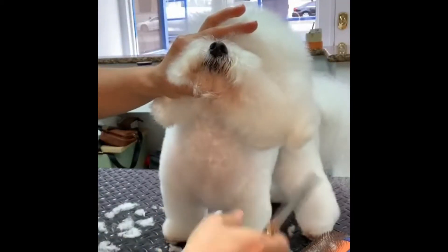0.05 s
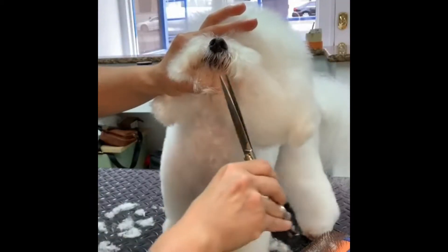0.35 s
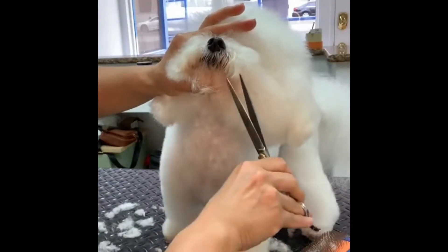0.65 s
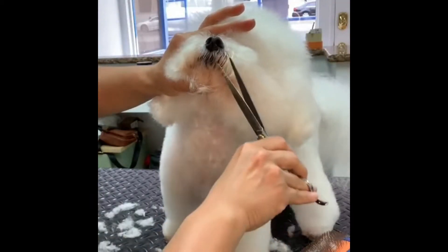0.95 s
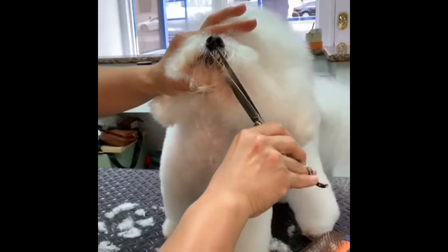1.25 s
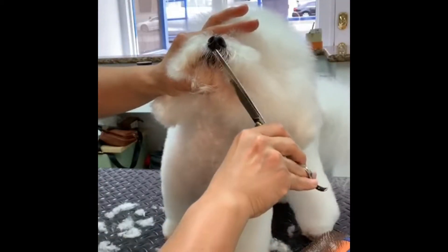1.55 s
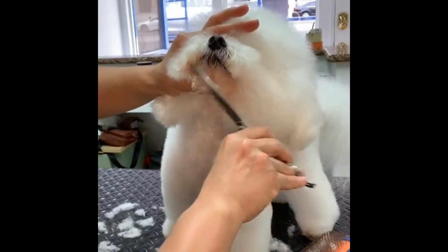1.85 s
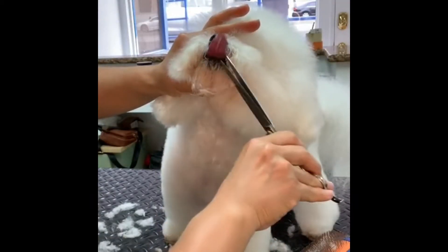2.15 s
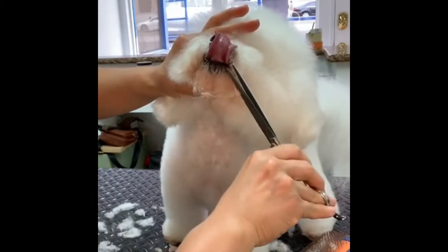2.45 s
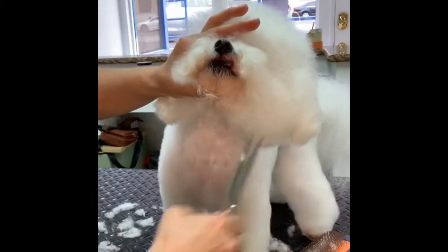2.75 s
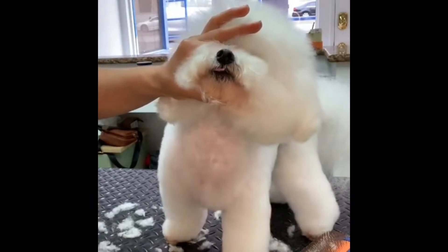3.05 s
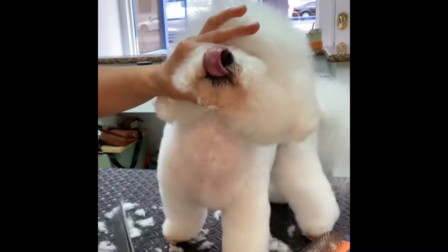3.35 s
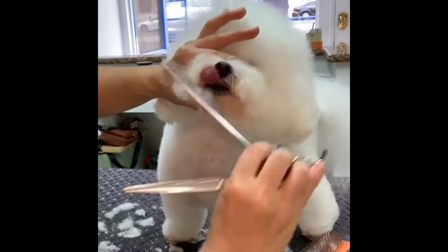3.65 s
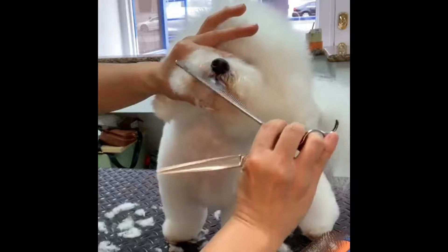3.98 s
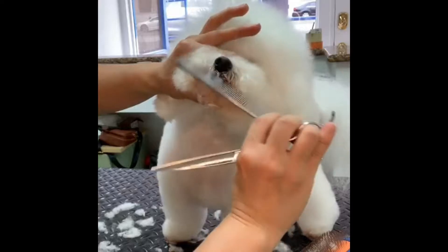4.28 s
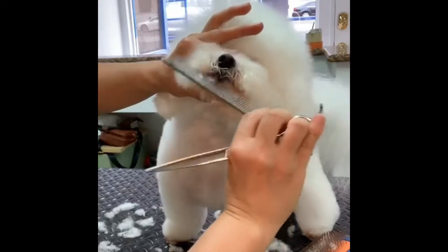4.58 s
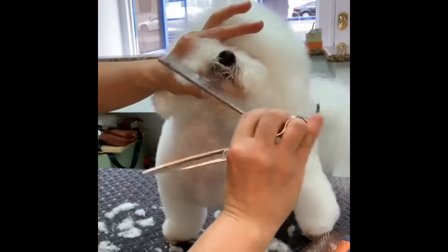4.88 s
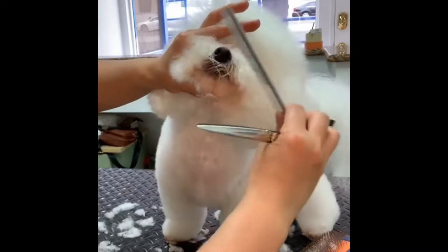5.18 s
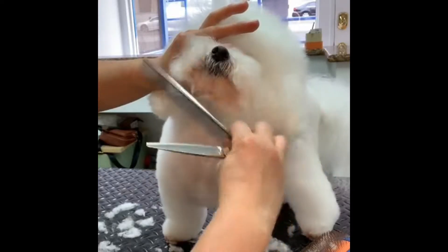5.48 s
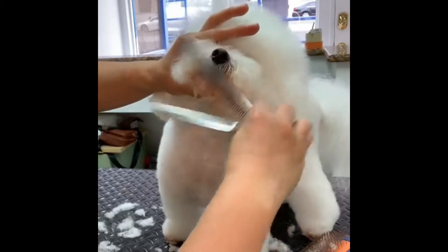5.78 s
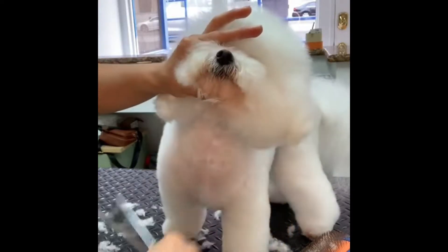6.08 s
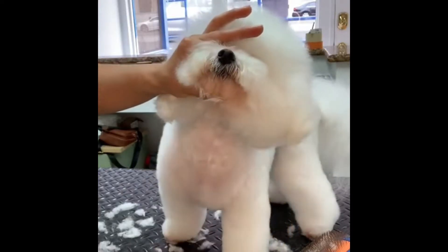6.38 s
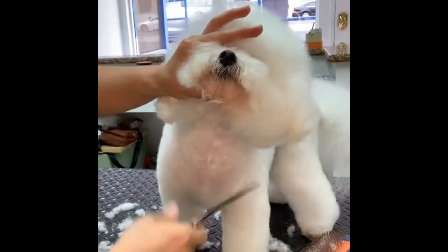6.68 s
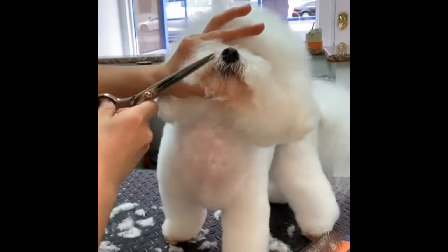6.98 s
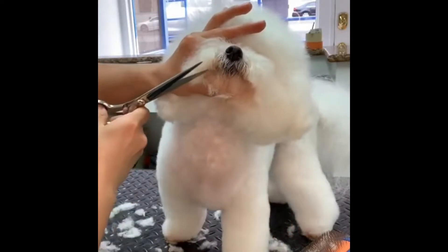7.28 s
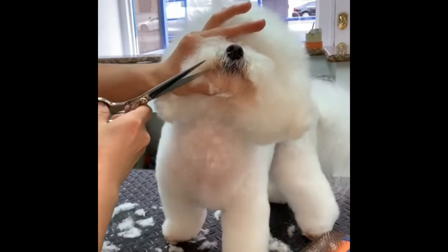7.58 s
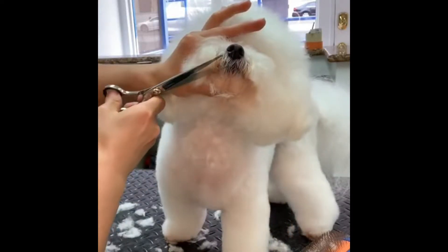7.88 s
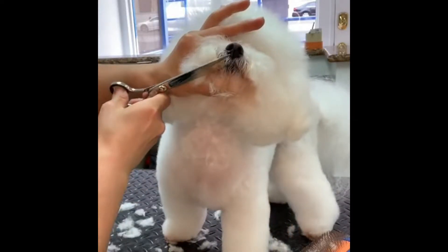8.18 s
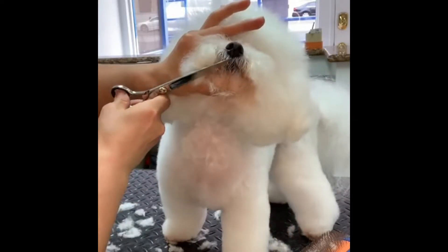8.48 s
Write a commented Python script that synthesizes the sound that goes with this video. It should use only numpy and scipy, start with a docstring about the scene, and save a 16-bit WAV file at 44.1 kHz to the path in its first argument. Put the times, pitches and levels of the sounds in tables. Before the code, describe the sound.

Grooming scissors snip and click up close while a metal comb clatters onto a counter twice, over low ventilation rumble.

```python
"""A metal comb clatters onto a counter over low ventilation rumble, in a bare, echoing grooming room.
Close to the microphone a dog is being trimmed: steel scissors slide, snip and click against the comb,
held in the same hand, and the steel rings on. A little further off, with more room in the sound,
the counter takes dull bumps, and the comb is picked up with a clink and dropped back, rocking to rest."""
import sys
import numpy as np
from scipy import signal
from scipy.fft import rfft, irfft
from scipy.io import wavfile

SR = 44100
rng = np.random.default_rng(int(sys.argv[2]) if len(sys.argv) > 2 else 0)


def log_audio(samples):
    """Write samples as a 16-bit WAV file to the path given in sys.argv[1]."""
    # one column per channel
    frames = np.atleast_2d(samples).T
    # limit to full scale, then quantise
    limited = np.clip(frames, -1, 1)
    pcm = np.round(limited * 32767).astype(np.int16)
    wavfile.write(sys.argv[1], SR, pcm)


N = 376173
RING_TIME = np.arange(int(1.3 * SR)) / SR  # time axis of one decay, t/s

# the counter's resonances: f/Hz, width/Hz, gain/dB
COUNTER_RESONANCES = [(100, 15, 3.5), (337, 53, 1.5), (670, 60, 0), (890, 28, -3), (1145, 41, -2),
                      (1434, 156, 2), (2010, 240, 9), (2430, 176, 5.5), (3420, 120, -3.5), (4020, 83, -0.5),
                      (4500, 200, -3.5)]


def undb(db):
    """Decibels to gain."""
    return 10 ** (np.asarray(db) / 20)


def unit(x):
    """Scale to rms 1."""
    return x / np.sqrt(np.mean(x ** 2))


def fade(t60):
    """Free decay that loses 60 dB in t60 seconds."""
    return np.exp(-np.log(1000) * RING_TIME / t60)


def lookup(points, hz):
    """Read points (f/Hz, value) on a log-frequency axis."""
    f, value = np.transpose(points)
    return np.interp(np.log(np.maximum(hz, 1)), np.log(f), value)


def noise(colour, size):
    """Noise of rms 1 with the given spectrum (f/Hz, level/dB)."""
    gain = undb(lookup(colour, np.fft.rfftfreq(size, 1 / SR)))
    return unit(irfft(rfft(rng.standard_normal(size)) * gain, size))


def walk(rate, size):
    """Random wandering through `rate` points a second, spread near 1."""
    return np.interp(np.arange(size) * rate / SR, np.arange(size), rng.standard_normal(size))


def add(track, s, sound):
    """Mix a sound in at s seconds."""
    start = max(int(s * SR), 0)
    track[start:start + len(sound)] += sound[:N - start]


def burst(colour, t60):
    """A short, dense shake with a smooth spectrum (f/Hz, level/dB) and the energy of 1 ms at rms 1."""
    shake = rfft(rng.standard_normal(len(RING_TIME)) * fade(t60))
    gain = undb(lookup(colour, np.fft.rfftfreq(len(RING_TIME), 1 / SR)))
    sound = irfft(gain * shake / np.abs(shake), len(RING_TIME)) * fade(10 * t60)
    return sound / np.linalg.norm(sound) * np.sqrt(SR / 1000)


def resonate(x, peaks):
    """Add damped resonances (f/Hz, width/Hz, gain/dB) to a sound."""
    return x + sum(undb(db) * signal.lfilter(*signal.iirpeak(hz, hz / width, fs=SR), x)
                   for hz, width, db in peaks)


def room(x, build_s):
    """Diffuse echo of hard walls, unit energy; the treble dies first."""
    decay_times = [(100, 0.86), (500, 0.97), (2000, 0.91), (4000, 0.99), (9000, 0.76), (14000, 0.45)]  # the room's decay: f/Hz, t60/s
    size = len(RING_TIME)
    hz = np.fft.rfftfreq(size, 1 / SR)
    spectrum = rfft(rng.standard_normal(size))
    centres_hz = np.geomspace(60, 15000, 12)
    tail = np.zeros(size)
    for centre, share in zip(centres_hz, np.eye(len(centres_hz))):
        band = irfft(spectrum * lookup(np.c_[centres_hz, share], hz), size)
        tail += band * fade(lookup(decay_times, centre))
    tail *= 1 - np.exp(-RING_TIME / build_s)
    return signal.fftconvolve(x, tail / np.linalg.norm(tail))[:N]


def ventilation(air_db=-48.5, hum_hz=122, hum_db=-62, waver_db=5.5):
    """Room tone: rumbling air with a wavering low hum."""
    air_colour = [(12, -21), (22, -1.5), (43, 2.5), (65, -9.5), (90, -15.5), (122, -10.5), (200, -18),
                  (360, -19.5), (650, -23.5), (1450, -29.5), (2100, -37.5), (5200, -47.5), (9500, -50.5),
                  (14000, -60.5)]  # spectrum of the moving air: f/Hz, level/dB
    air = undb(air_db + 0.31 * walk(4, N)) * noise(air_colour, N)
    hum_gain = undb(hum_db + waver_db * walk(3.1, N))
    hum_phase = 2 * np.pi * hum_hz * np.arange(N) / SR + walk(17, N)
    return air + hum_gain * np.sin(hum_phase)


def blows(events, peaks, colour, thud_t60, direct_db, room_db, treble_hz=4200):
    """Blows at the counter: a quickly damped thud drives resonances, heard mostly through the room."""
    direct = np.zeros(N)
    for s, db, drive_db, treble_db in events:
        # a harder edge landing gives more treble
        edge = [(hz, band_db + treble_db * (hz > treble_hz)) for hz, band_db in colour]
        driven_peaks = np.add(peaks, [0, 0, drive_db])
        add(direct, s, undb(db) * resonate(burst(edge, thud_t60), driven_peaks))
    return undb(direct_db) * direct + undb(room_db) * room(direct, build_s=0.0028)


def comb_drops(touch_lead_s=0.015, touch_db=-12, rock_period_s=0.0235, rock_loss_db=3.5):
    """Off at the counter one end touches first, then the comb lands and rocks, each knock softer."""
    landings = [(0.001, -7, -10, 1), (6.5543, -4, 1.5, -2.5)]  # the comb lands: t/s, relative level/dB, resonance drive/dB, treble/dB
    thud_colour = [(40, -22.5), (95, -0.5), (220, -7.5), (450, 1.5), (1000, -1.5), (1450, -2.5), (2300, -9),
                   (3600, -8.5), (5000, -18), (9500, -16), (11000, -25), (14000, -36)]  # thud of comb on counter: f/Hz, level/dB
    knocks = [(-touch_lead_s, touch_db)] + [(k * rock_period_s, -k * rock_loss_db) for k in range(5)]
    clatter = [(s + delay, db + softer_db, drive_db, treble_db)
               for s, db, drive_db, treble_db in landings
               for delay, softer_db in knocks if s + delay >= 0]
    return blows(clatter, COUNTER_RESONANCES, thud_colour, thud_t60=0.074, direct_db=-9, room_db=-6.5)


def contact(colour, uneven_db=2.5, spacing_hz=400):
    """Each touch lands elsewhere on the steel and favours other pitches of its spectrum."""
    hz = colour[0][0] + spacing_hz * np.arange(48)
    scatter_db = uneven_db * rng.uniform(-np.sqrt(3), np.sqrt(3), len(hz))
    return np.c_[hz, lookup(colour, hz) + scatter_db]


def ring(modes, scatter_db=3):
    """Struck modes; each blow lands elsewhere and gives them a new strength and phase."""
    phases = rng.uniform(0, 2 * np.pi, len(modes))
    offsets_db = scatter_db * rng.uniform(-1, 1, len(modes))
    return sum(undb(db + offset_db) * fade(t60) * np.sin(2 * np.pi * hz * RING_TIME + phase)
               for (hz, db, t60), phase, offset_db in zip(modes, phases, offsets_db))


def tool_clicks(level_db=-10, width_hz=450, room_db=-4, full_chatter_t60=0.067, halving_db=21):
    """Close to the microphone, comb and scissors touch and chatter, longer the harder they meet."""
    # steel meets steel, the shifting grip damping each ring differently:
    # t/s, relative level/dB, main resonance f/Hz, its gain/dB, after-ring gain/dB
    touches = [(0.0555, -30.5, 8850, 22, -42), (0.1236, -29, 8800, 14.5, -34),
               (0.203, -13, 9480, 12.5, -44), (3.4006, -26, 9500, -1, -42), (3.421, -20, 9540, 6.5, -41),
               (3.767, -36.5, 8800, 4, -30), (3.956, -44, 9060, 7, -34), (4.149, -43, 9540, 14, -31),
               (4.478, -34, 9800, 19.5, -39), (4.773, -43, 9800, 21, -36), (4.8918, -41, 5600, 6, -30),
               (5.1838, -34, 8800, 12.5, -29), (6.8838, -16.5, 9620, 14, -33)]
    clack_colour = [(1000, -37), (3200, -19), (4600, -14.5), (6500, -9), (8500, -2), (9700, -4),
                    (10400, -4.5), (11200, -8.5), (12500, -0.5), (13700, -6)]  # short clack of the steel: f/Hz, level/dB
    body_peaks = [(3600, 1400, 14), (5470, 130, 10.5), (6530, 200, 4.5), (7720, 110, 5), (11150, 350, 0.5),
                  (13650, 280, 1)]  # body resonances of the tools: f/Hz, width/Hz, gain/dB
    tool_modes = [(5550, 3, 0.72), (7570, -2.5, .8), (8630, -11, .5), (9550, -12, 0.55), (11150, 2.5, .22)]  # after-ring of the tools: f/Hz, level/dB, t60/s
    clacks, rings = np.zeros((2, N))
    for s, db, hz, peak_db, ring_db in touches:
        chatter = burst(contact(clack_colour), full_chatter_t60 * 2 ** (db / halving_db))
        add(clacks, s, undb(db) * resonate(chatter, [(hz, width_hz, peak_db)] + body_peaks))
        add(rings, s, undb(db + ring_db) * ring(tool_modes))
    return undb(level_db) * (clacks + rings + undb(room_db) * room(clacks, build_s=0.00267))


def counter_bumps(drive_db=-3, treble_db=0):
    """Dull bumps a little way off, each driving the counter's resonances alike."""
    bumps = [(0.07, -17), (0.225, -16.5), (3.092, -27), (6.3461, -21.5), (6.377, -29), (6.562, -15)]  # soft knocks on the counter: t/s, relative level/dB
    thud_colour = [(50, -13), (180, -1), (320, 3.5), (460, -5.5), (700, -5.5), (1300, -19), (3000, -33.5),
                   (9000, -33), (13000, -46.5)]  # thud of a bump: f/Hz, level/dB
    knocks = [(s, db, drive_db, treble_db) for s, db in bumps]
    return blows(knocks, COUNTER_RESONANCES, thud_colour, thud_t60=0.075, direct_db=-6, room_db=-5)


def rub(length_s, rasp_db, grit_db=6, grit_rate=160, rasp_hz=3250, rasp_width_hz=1100):
    """Steel rubs with a gritty hiss and rasps lower down when pressed."""
    hiss_colour = [(800, 3), (2800, -2), (5000, -9), (7300, 0), (8600, -3), (9600, 4.5), (10800, -12),
                   (13500, -11.5)]  # hiss of sliding steel: f/Hz, level/dB
    size = int(length_s * SR)
    hiss = noise(hiss_colour, len(RING_TIME))
    grit = undb(grit_db * walk(grit_rate, len(RING_TIME)))
    friction = unit((hiss * grit)[:size])
    return resonate(friction, [(rasp_hz, rasp_width_hz, rasp_db)]) * signal.windows.tukey(size, 0.5)


def scissors(ring_db=-36, room_db=2, tick_t60=0.024, closing_db=-21):
    """Close by, the blades rub as they close and shut with a tick; between strokes the steel slides."""
    strokes = [(1.537, -53.5, .012, -4), (1.698, -37.5, 0.013, -6), (2.04, -51, 0.02, -4),
               (2.3197, -62, .005, 2), (2.872, -43, .012, -4), (3.026, -50, 0.012, -4),
               (8.3925, -55, 0.0058, 15), (8.4672, -39.5, 0.023, 8)]  # the blades shut: t/s, level/dB, closing time/s, rasp/dB
    tick_colour = [(1000, -31), (3000, -19), (5000, -8), (6200, -2), (7700, -10), (8750, 5), (9900, -5),
                   (10800, -6), (11500, -11), (12900, -1), (13650, -1)]  # tick of the blades: f/Hz, level/dB
    blade_modes = [(6158, -10, .5), (8900, 14, .5), (13680, -1, .3)]  # after-ring of the blades: f/Hz, level/dB, t60/s
    slides = [(1.53, 0.061, -84, -2), (2.036, 0.15, -74, 0), (2.621, 0.63, -69, -9),
              (3.088, 0.13, -66.5, 6.5), (3.3, 0.019, -51.5, 12.5), (5.685, 0.062, -68.5, -2),
              (5.84, 0.094, -68.5, -13), (6.368, 0.051, -57, 6.5)]  # steel on steel, hair or counter: t/s, length/s, level/dB, rasp/dB
    direct, rings = np.zeros((2, N))
    for s, db, closing_s, rasp_db in strokes:
        add(direct, s - closing_s, undb(db + closing_db) * rub(closing_s, rasp_db))
        add(direct, s, undb(db) * burst(tick_colour, tick_t60))
        add(rings, s, undb(db + ring_db) * ring(blade_modes))
    for s, length_s, db, rasp_db in slides:
        add(direct, s, undb(db) * rub(length_s, rasp_db))
    return direct + rings + undb(room_db) * room(direct, build_s=0.0042)


def comb_pickup():
    """Off at the counter the comb is knocked as it is lifted, and its own resonances clink."""
    knocks = [(3.3508, -24.5, 5, -4.5), (3.3535, -27, -3, 3), (3.378, -26, -2, 5.5)]  # knocks on the comb: t/s, relative level/dB, resonance drive/dB, treble/dB
    comb_peaks = [(1186, 44, 11.5), (1476, 31, 17.5), (1510, 52, 12), (1770, 98, 8.5), (2333, 96, 5.5),
                  (3390, 250, 7), (4360, 89, 2)]  # the comb's resonances: f/Hz, width/Hz, gain/dB
    knock_colour = [(150, 0), (400, 9), (900, -6.5), (1700, 3), (3300, -5), (5200, -11.5), (9500, -3),
                    (13000, -30)]  # spectrum of one knock: f/Hz, level/dB
    return blows(knocks, comb_peaks, knock_colour, thud_t60=0.048, direct_db=-7, room_db=-5)


def scene():
    """One microphone at the grooming table: tools close, counter further off, room tone all round."""
    counter = comb_drops() + comb_pickup() + counter_bumps()
    close_tools = tool_clicks() + scissors()
    return (counter + close_tools + ventilation())[None]


def record(dry, top_hz=14000):
    """The recorder cuts the top steeply."""
    return signal.sosfilt(signal.ellip(10, 0.2, 70, top_hz, fs=SR, output="sos"), dry)


dry = scene()
out = record(dry)
log_audio(out)
```